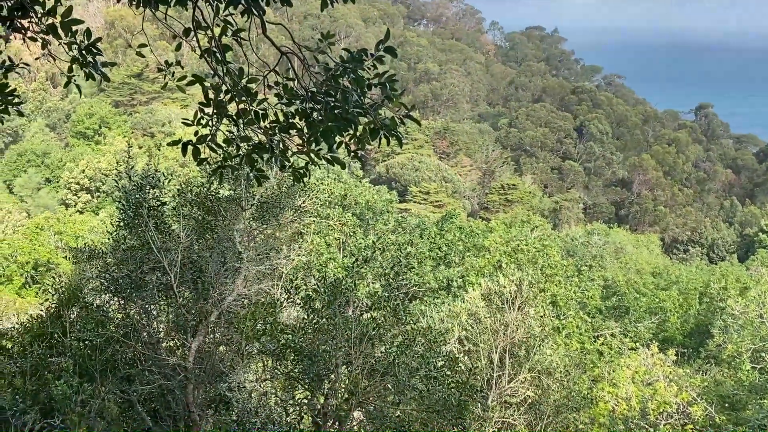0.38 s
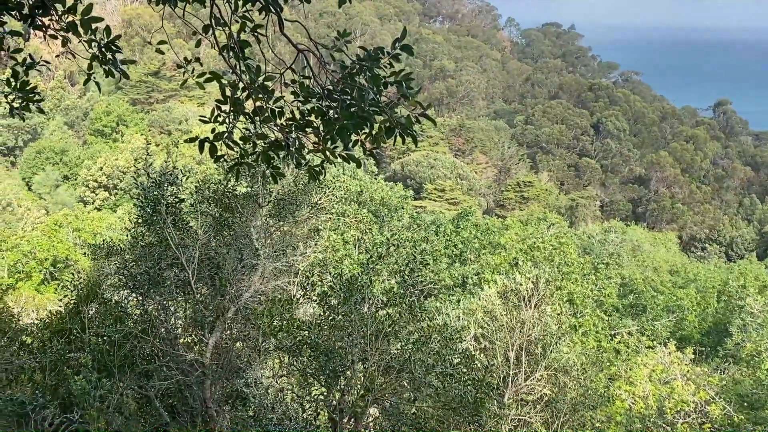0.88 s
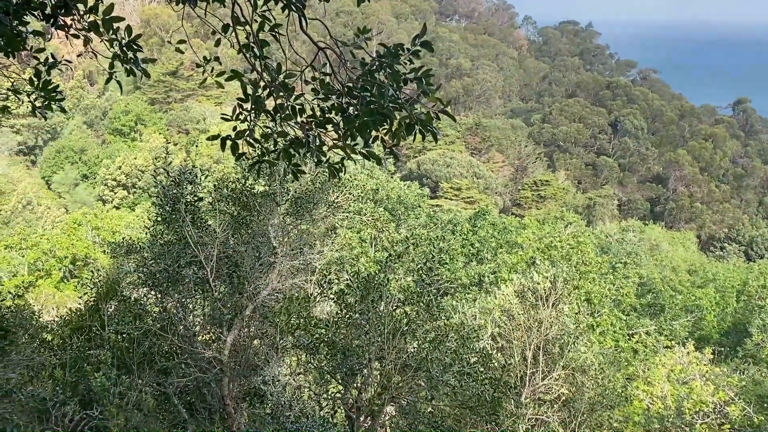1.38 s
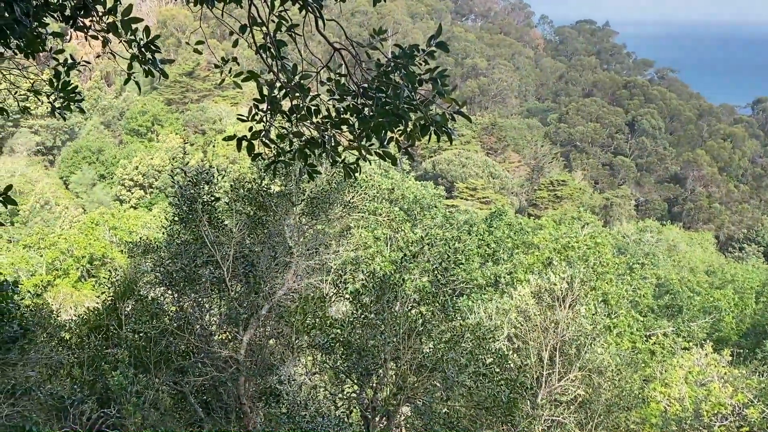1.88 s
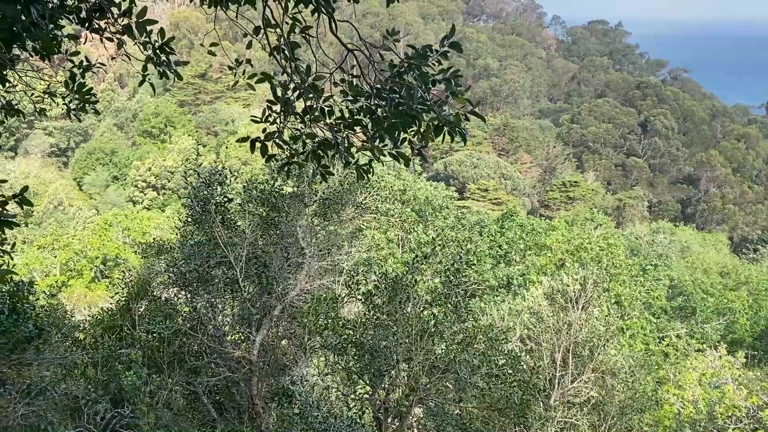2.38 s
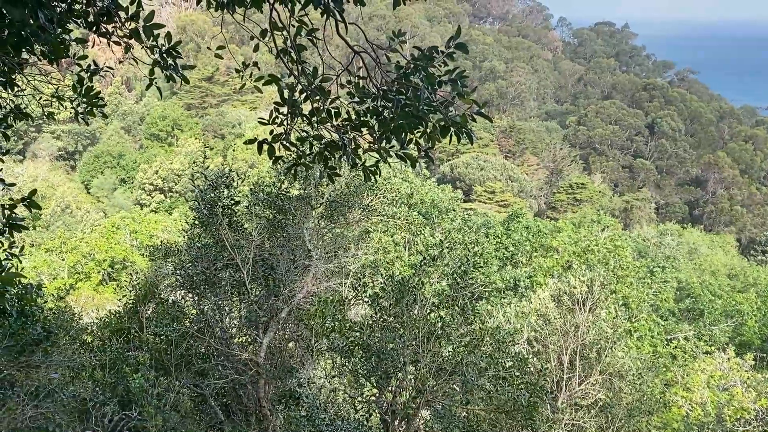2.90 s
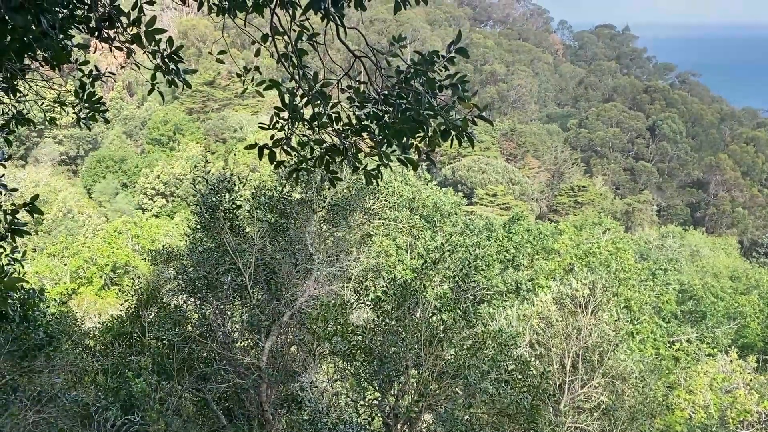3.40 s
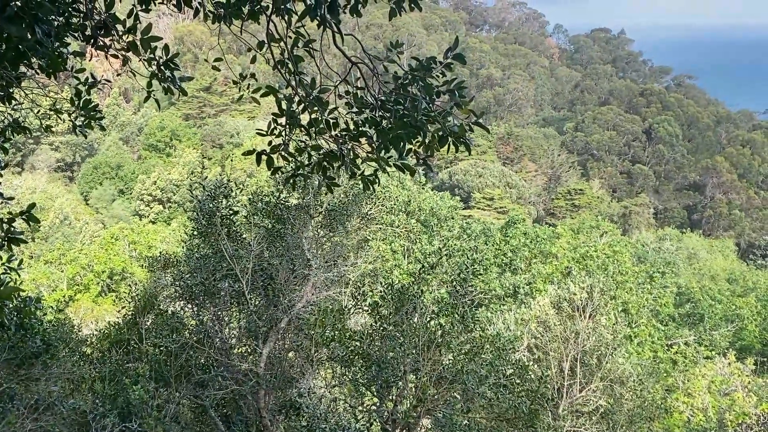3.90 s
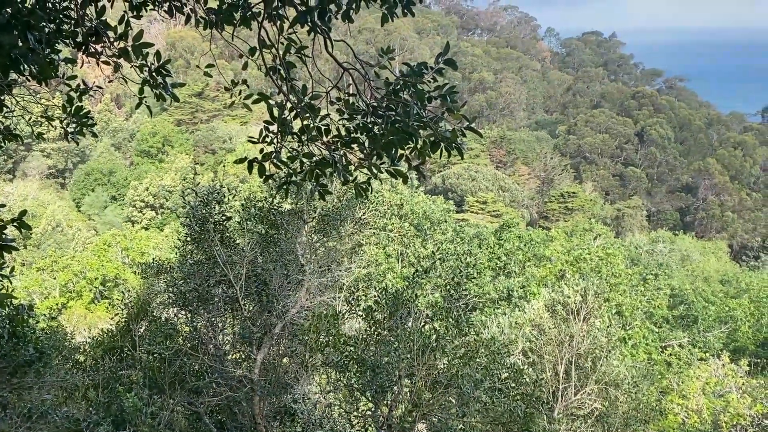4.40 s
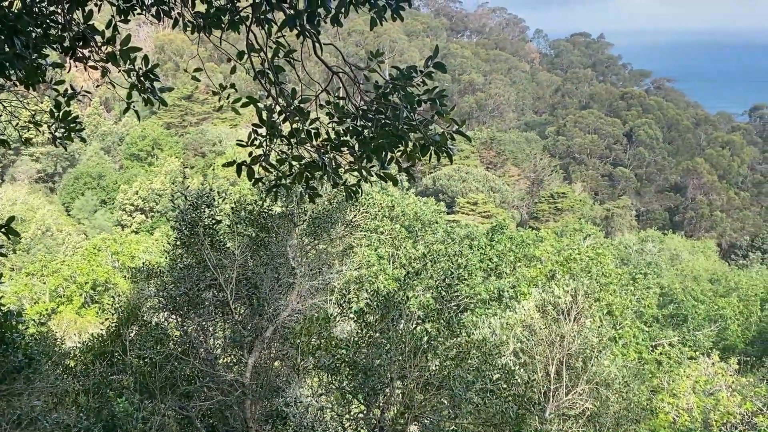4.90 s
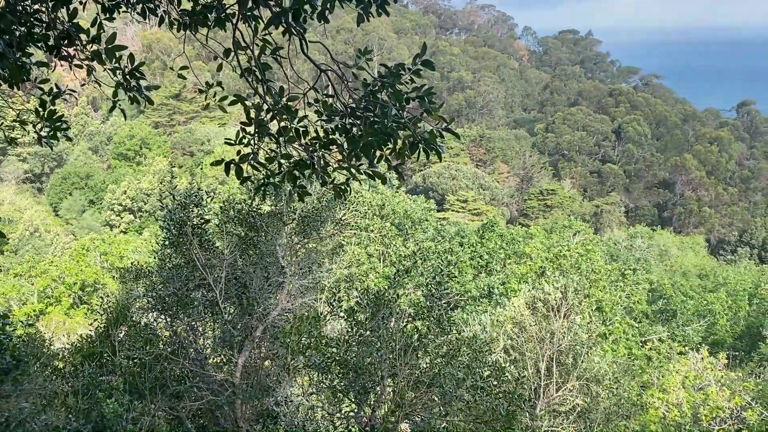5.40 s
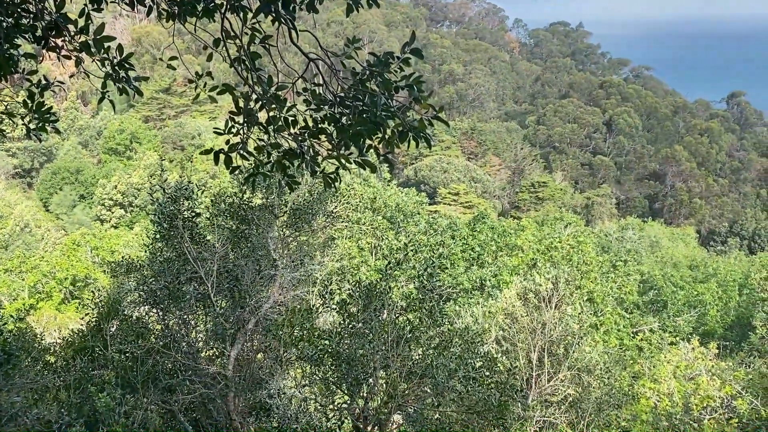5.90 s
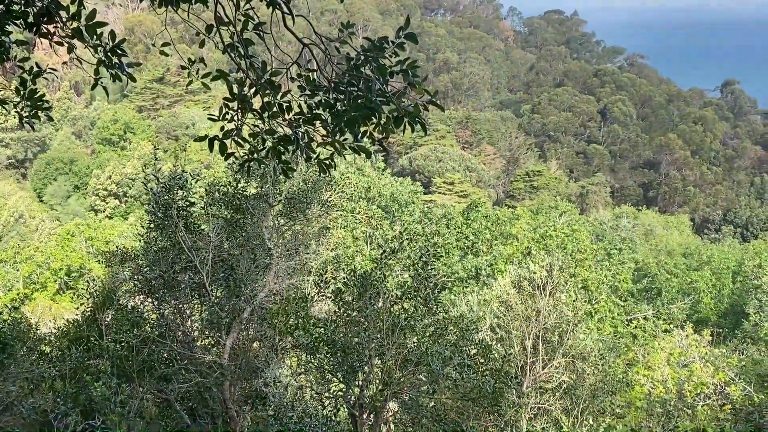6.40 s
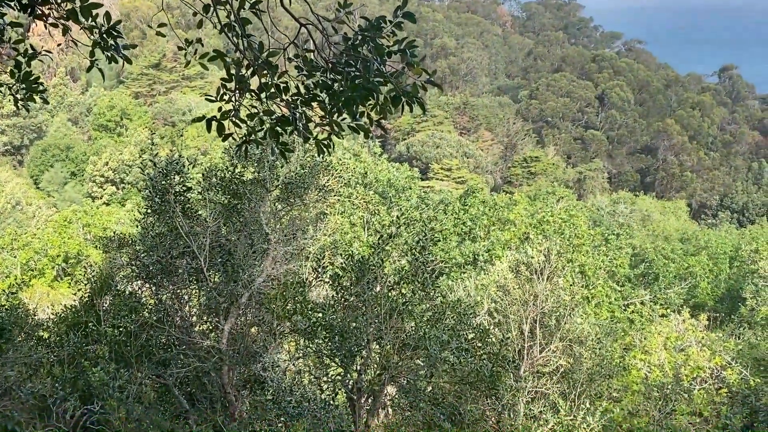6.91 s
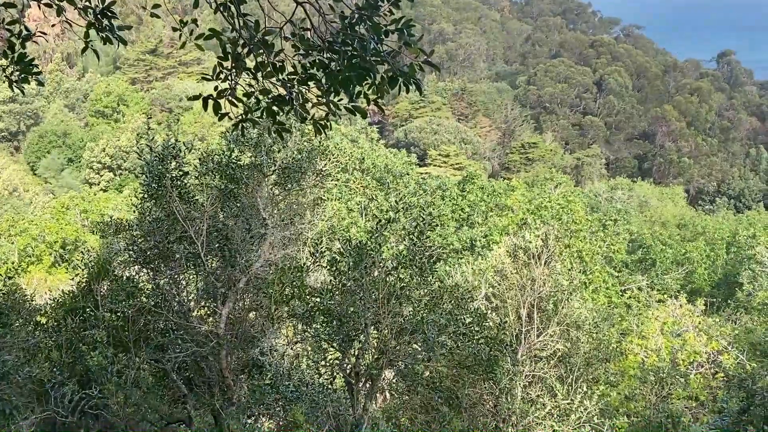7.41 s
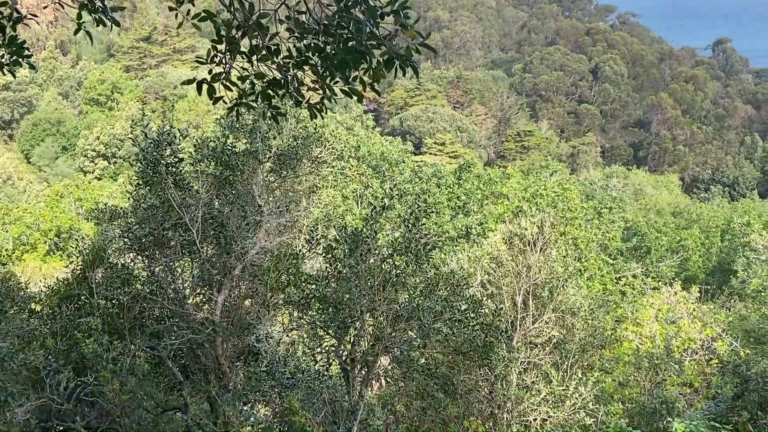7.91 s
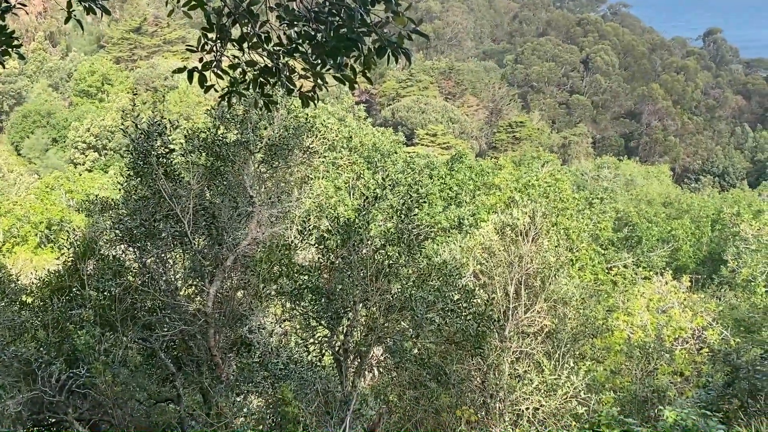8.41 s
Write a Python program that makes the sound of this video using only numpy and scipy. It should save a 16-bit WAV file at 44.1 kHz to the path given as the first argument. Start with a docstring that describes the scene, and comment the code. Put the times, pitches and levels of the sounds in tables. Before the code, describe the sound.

A wooded hillside above the sea, heard in outdoor stereo. From 0 s small birds overlap in quick high whistles and falling slurs, blurred by echoes off trunks and slope; a lower warbler repeats short figures on the left. An echoing rattle and chip come near 0.9 s, a fluttering note around 1.3 s, then a high looping trill from 1.7 to 2.5 s, gradually slowing. Buzzy shaken notes sound near 2.9 and 3.6-3.9 s, among bright couplets, hooked calls and low piping. The high singer's opening phrase returns about 4.1 s, with soft coos; a rattle runs from 4.8 to 5.4 s. A sharp twig snap lands at 6.3 s, before sparser piping, a brief rattle at 7.1 s, chips and duller taps near 7.6 s. Far surf, faint leaf hiss and low wind rumble continue throughout, with bass buffets at 3.5 s and near the end.

```python
"""A wooded hillside above the sea: wind buffets the microphone over a far low roar of surf and hissing leaves.
From the outset small birds whistle and slur, their gliding tones smeared by echoes off trunks and leaves, and
twigs tap now and then as bursts of noise through a resonance. A low warbler comes in on the left, then echoing
rattles, chips in the open and pulsing flutters. A slow trill begins before two seconds, shaken buzzy notes
before three; the song's opening returns later, and piping carries on towards the end."""
import sys
import numpy as np
from scipy import signal
from scipy.fft import rfft, irfft, next_fast_len
from scipy.io import wavfile
from scipy.ndimage import uniform_filter1d

SR = 44100
rng = np.random.default_rng(int(sys.argv[2]) if len(sys.argv) > 2 else 0)


def put_to_file(sound):
    """Save the sound as 16-bit audio at rate SR, in the file named by the first command-line argument."""
    columns = np.atleast_2d(sound).T  # one column per channel
    safe = np.clip(columns, -1, 1)
    whole_steps = np.round(safe * 32767)
    wavfile.write(sys.argv[1], SR, whole_steps.astype(np.int16))


def level_to_linear(level):
    """Convert decibel levels to linear amplitude factors, elementwise."""
    exponent = np.asarray(level, float) / 20
    return 10 ** exponent


N = 376613  # samples

# share of its glide that a note has covered half-way through: rising, falling [0-1]
CHORUS_SHARE = (0.61, 0.42)
# the same for the wren and for the couplets: rising, falling [0-1]
WREN_SHARE = (.8, 0.66)


def along(table, hz):
    """A (hz, value) table read on a log-frequency axis."""
    f, v = np.transpose(table)
    return np.interp(np.log(hz + 1), np.log(f + 1), v)


def curve(table):
    """The columns of a (time_s, ..) table, sample by sample."""
    s, *columns = np.transpose(table)
    return [np.interp(np.arange(N) / SR, s, c) for c in columns]


def walk(rate):
    """Random levels held 1 / rate s and slewed twice; spread near 1."""
    k = int(SR / rate)
    held = np.repeat(rng.standard_normal(N // k + 1), k)
    return 1.29 * uniform_filter1d(uniform_filter1d(held, k), k)[:N]


def air(spectrum, lo_hz, hi_hz):
    """Two-eared noise of a given colour, rms 1 between two frequencies, alike in the bass."""
    # share of the noise common to both ears: pitch_hz, share [0-1]
    likeness = [(60, 0.99), (240, 0.77), (500, 0.4), (1000, 0), (4000, 0.5), (9000, 0.16)]
    size = next_fast_len(N)
    hz = np.arange(size // 2 + 1) * SR / size
    like = np.clip(along(likeness, hz), 0, 1)
    mid, side = rfft(rng.standard_normal((2, size)))
    gain = level_to_linear(along(spectrum, hz))
    in_band = (hz > lo_hz) & (hz < hi_hz)
    gain = gain / np.sqrt(2 * np.sum(gain[in_band] ** 2) / size)
    mid = mid * np.sqrt((1 + like) / 2)
    side = side * np.sqrt((1 - like) / 2)
    return irfft(gain * np.array([mid + side, mid - side]), size)[:, :N]


def add(track, start_s, sound):
    """Mix a sound into a track."""
    i = max(int(start_s * SR), 0)
    track[i:i + len(sound)] += sound[:len(track) - i]


def tone(hz, db, edge=0.15):
    """A near-pure tone along a pitch path, swelling and fading."""
    swell = signal.windows.tukey(len(hz), edge)
    return np.sqrt(2) * level_to_linear(db) * swell * np.sin(2 * np.pi * np.cumsum(hz) / SR)


def whistle(notes, wobble_hz=44.8, edge=0.29):
    """Each note glides through its three pitches, corners rounded, never quite steady."""
    out, wobble = np.zeros(N), wobble_hz * walk(400)
    for start_s, length_s, *pitch_hz, db in notes:
        path = np.interp(np.linspace(0, 2, int(length_s * SR)), np.arange(3), pitch_hz)
        path = uniform_filter1d(path, int(len(path) * 0.2), mode="nearest")
        path = path + np.roll(wobble, -int(start_s * SR))[:len(path)]
        add(out, start_s, tone(path, db, edge=edge))
    return out


def bend(notes, share):
    """Give each glide its middle pitch."""
    return [(s, length, a, a + share[int(b < a)] * (b - a), b, db) for s, length, a, b, db in notes]


def repeat(figure, times, gains_db=0):
    """The same notes again at each time."""
    return [(at + s, *rest, db + g) for at, g in np.broadcast(times, gains_db) for s, *rest, db in figure]


def shaken(notes, swing, rate, scatter, pulse, edge, grow_s):
    """Vibrato spreads each note into a blurred comb and pulses its loudness, loudest at the top of a swing."""
    out, chance = np.zeros(N), walk(90)
    for start_s, length_s, first_hz, last_hz, db in notes:
        t = np.arange(int(length_s * SR)) / SR
        uneven = 1 + scatter * chance[int(start_s * SR):][:len(t)]
        shake = np.sin(2 * np.pi * rate * np.cumsum(uneven) / SR)
        glide = first_hz + (last_hz - first_hz) * t / length_s
        path = glide * (1 + swing * (1 - np.exp(-t / grow_s)) * shake)
        add(out, start_s, (1 + pulse * shake) * tone(path, db, edge=edge))
    return out


def wood(sound, pan_db, wet_db, build_s=0.0036):
    """Direct sound plus echoes off near trunks and leaves, and a longer, fainter, duller tail from the slope."""
    near_t60_s, slope_t60_s, slope_db, slope_top_hz = 0.35, 1.04, -13, 5500
    spread = 0.21  # how far the echoes differ between the ears
    t = np.arange(int(1.2 * SR)) / SR
    shared, own = rng.standard_normal((2, len(t)))
    cloud = (shared + spread * own * np.array([[1], [-1]])) * (1 - np.exp(-t / build_s))
    dull = signal.lfilter(*signal.butter(2, slope_top_hz, fs=SR), cloud)
    near = cloud * np.exp(-t * np.log(1000) / near_t60_s)
    slope = level_to_linear(slope_db) * dull * np.exp(-t * np.log(1000) / slope_t60_s)
    echo = near + slope
    echo = echo / np.sqrt(np.sum(echo[0] ** 2))
    wet = signal.fftconvolve(sound[None], echo, axes=1)[:, :N]
    # pan_db: left over right
    return (sound + level_to_linear(wet_db) * wet) * level_to_linear(np.array([[pan_db], [-pan_db]]) / 2)


def wind():
    """Turbulence on the microphone, all bass, with a few single thumps of two or three swings."""
    # colour of the rumble: pitch_hz, density_db (relative, per Hz)
    rumble_colour = [(18, -48), (30, -22.5), (45, 0), (65, 4), (100, 5.5), (180, -11.5), (300, -29),
                     (900, -100)]
    # rise and fall of the gusts: time_s, level_db
    gusts = [(0.0, -38), (1.66, -39.5), (1.81, -27), (1.92, -42.5), (2.28, -34.5), (2.43, -39.5),
             (3.47, -32), (4.05, -35), (5.3, -34), (5.66, -34), (6.28, -32.5), (6.54, -40), (7.32, -32.5),
             (7.42, -25.5), (7.5, -30), (8.0, -34.5), (8.49, -22), (8.54, -33)]
    # single hard buffets: centre_s, level_db, pitch_hz
    buffets = [(1.805, -21.5, 64), (3.466, -13, 75), (3.559, -13, 79.7), (5.679, -16, 61.6),
               (8.278, -14, 69.6), (8.459, -7.5, 70.7), (8.497, -11, 80)]
    pan_db = -2.8  # left over right
    lag = 11  # samples by which a buffet reaches the left port later
    thumps, t = np.zeros(N), np.arange(-2000, 2000) / SR
    for s, db, hz in buffets:
        add(thumps, s + t[0], level_to_linear(db) * np.exp(-(t / 0.0083) ** 2) * np.sin(2 * np.pi * hz * t))
    rumble = air(rumble_colour, 30, 100.6) * level_to_linear(curve(gusts)[0] + 0.48 * walk(22))
    both_ports = rumble + np.array([np.roll(thumps, lag), thumps])
    return both_ports * level_to_linear(np.array([[pan_db], [-pan_db]]) / 2)


def surf():
    """A far roar that swells slowly, and leaves hissing faintly as the breeze rises with it."""
    # swell of the roar: time_s, level_db
    swell = [(0.0, -38.5), (0.62, -47), (1.57, -39.5), (2.97, -47.5), (3.73, -43), (7.18, -39),
             (8.54, -36.5)]
    # colours of roar and leaves: pitch_hz, density_db (relative, per Hz)
    roar_colour = [(53, -38.5), (90, 4), (128, -1), (197, -7), (427, -39.5), (500, -39.5), (650, -72.5),
                   (1100, -120)]
    leaf_colour = [(180, -24), (300, 0), (420, -10), (700, -15.5), (1500, -28), (3300, -36.5), (6200, -34),
                   (8300, -45), (10000, -72)]
    # leaves stirring close by: centre_s, half_length_s, extra_db
    rustles = [(3.248, 0.15, 6), (5.217, 0.14, 6), (5.859, 0.17, 3.5), (6.273, 0.051, 6),
               (7.612, 0.043, 7.5)]
    roar_db = curve(swell)[0]
    # at a roar of -42 dB the leaves stand at -66.5 dB, and gain 0.4 dB per dB of roar
    leaves_db = -66.5 + 0.4 * (roar_db + 42)
    t = np.arange(N) / SR
    leaves_db = leaves_db + sum(db * np.exp(-((t - s) / half) ** 2) for s, half, db in rustles)
    roar = air(roar_colour, 105.0, 300) * level_to_linear(roar_db + 2.0 * walk(5.6))
    return roar + air(leaf_colour, 418.0, 840) * level_to_linear(leaves_db + 1.5 * walk(10))


def far_birds(count=420):
    """Scattered short slurs, mostly falling, from birds all over the slope."""
    # loudness of the distant birds: time_s, level_db
    distance_level = [(0, -75), (1.3, -73), (2.3, -87), (2.6, -97.5), (4.3, -72), (5.2, -79), (6.6, -87),
                      (7.6, -77), (8.54, -100.5)]
    s, length, pitch, middle, end, size = rng.random((count, 6)).T
    hz = 2700 * 2.5 ** (pitch ** 1.6)
    middle_hz, last_hz = hz * (0.8 + 0.3 * middle), hz * (0.4 + 0.412 * end)
    notes = np.transpose([s * N / SR, 0.013 + 0.021 * length, hz, middle_hz, last_hz, -7 * size])
    return whistle(notes, wobble_hz=89.0) * level_to_linear(curve(distance_level)[0])


def chorus():
    """Single glides, couplets and a steady dove-like coo from the trees."""
    # gliding and level whistles: start_s, length_s, first_hz, last_hz, level_db
    glides = [(0.003, 0.023, 2880, 2890, -61.5), (0.025, 0.036, 3710, 4640, -57.5),
              (0.404, 0.041, 6000, 6000, -66), (0.527, 0.026, 5870, 5810, -60.5),
              (1.41, 0.058, 4950, 5340, -67), (2.965, 0.082, 4390, 3940, -79),
              (3.155, 0.02, 4100, 5300, -78.5), (3.522, 0.052, 4670, 4180, -62.5),
              (3.54, 0.059, 5400, 5390, -73.5), (3.675, 0.034, 5570, 5170, -63),
              (3.684, 0.037, 6260, 6080, -63), (3.759, 0.021, 4490, 4180, -63.5),
              (3.61, 0.052, 5500, 5270, -68), (3.79, 0.12, 5370, 5290, -68), (3.95, 0.1, 3284, 3910, -72),
              (6.415, 0.063, 4200, 4600, -82), (6.551, 0.098, 8040, 6920, -72),
              (6.62, 0.061, 7180, 6780, -70), (6.732, 0.047, 6370, 6600, -66),
              (6.777, 0.026, 5950, 5530, -65), (6.993, 0.063, 2996, 2930, -68.5),
              (7.45, 0.049, 7000, 6430, -79.5), (7.49, 0.034, 6500, 7100, -77.5),
              (7.096, 0.069, 5480, 5460, -73.5), (7.505, 0.094, 5320, 5400, -69.5),
              (7.6, 0.076, 5280, 5380, -71), (7.656, 0.018, 4780, 3840, -63.5),
              (7.668, .024, 3930, 2900, -59.5), (7.76, 0.089, 5280, 5400, -72.5),
              (7.8, 0.013, 2480, 1470, -64), (7.91, 0.076, 3410, 3690, -71.5),
              (7.99, 0.11, 3810, 3710, -72), (8.025, 0.025, 3700, 2680, -71.5),
              (8.102, 0.035, 3600, 2910, -70), (8.14, .04, 2960, 3180, -70.5),
              (8.175, 0.063, 3200, 2920, -74.5)]
    # a sagging note, a flick up and down, a low hold: start_s, length_s, first_hz, last_hz, gain_db
    couplet = [(0, 0.027, 5530, 4990, 1), (.027, 0.017, 5140, 6280, 1.5), (.037, .022, 6250, 5150, -5),
               (.058, 0.028, 4906, 4800, -5)]
    # when the couplet is sung: start_s, level_db
    couplet_times = [(3.183, -55), (3.262, -58), (3.91, -51.5), (3.99, -55)]
    # coos on one pitch: start_s, length_s, level_db
    coo_times = [(4.356, 0.083, -65.5), (4.482, 0.17, -78), (5.16, 0.17, -67)]
    coo_hz = 1126
    coos = [(s, length, coo_hz, coo_hz, coo_hz, db) for s, length, db in coo_times]
    couplets = bend(repeat(couplet, *np.transpose(couplet_times)), WREN_SHARE)
    return whistle(bend(glides, CHORUS_SHARE) + couplets) + whistle(coos, wobble_hz=12)


def wren(count=6):
    """A loud high singer deep in the trees: gliding notes, a repeated opening and close, a slowing trill."""
    # song notes: start_s, length_s, first_hz, last_hz, level_db
    song = [(0.004, 0.043, 5100, 4980, -58.5), (1.108, 0.024, 5100, 3600, -56.5),
            (1.18, 0.066, 5310, 4700, -54.5), (1.597, 0.03, 8270, 7730, -55),
            (1.625, 0.039, 7420, 4390, -56), (5.338, 0.035, 4990, 5070, -63.5),
            (5.598, 0.024, 5190, 3620, -65)]
    # opening phrase: start_s, length_s, first_hz, last_hz, level_db
    phrase = [(0.136, 0.096, 7690, 6570, -62), (.182, 0.037, 6780, 4340, -58),
              (0.272, 0.046, 8300, 8650, -67), (.3, 0.055, 8750, 7200, -62.5),
              (0.362, 0.045, 5780, 4410, -58.5), (0.568, 0.061, 5560, 5690, -58.5),
              (0.68, 0.064, 7330, 7670, -55), (.733, 0.025, 7600, 6760, -53),
              (.778, 0.024, 6400, 4230, -68.5)]
    # the closing arch, up, held and down: start_s, length_s, first_hz, last_hz, gain_db
    arch = [(0, .034, 6100, 7030, -0.5), (.026, 0.046, 7116, 7030, -3), (0.071, .05, 6980, 6260, -4.5)]
    # when the arch is sung: start_s, level_db
    closes = [(.958, -54), (5.441, -53)]
    # one trill syllable, low lead-in, rise, held top and swelling fall:
    # start_s (from the syllable's start), length_s, first_hz, last_hz, level_db
    syllable = [(-.014, .022, 3200, 4330, -70), (.004, 0.043, 4300, 7410, -56),
                (.034, .04, 7450, 7490, -59.5), (.066, .02, 7400, 5500, -58.5),
                (.082, .024, 5400, 4370, -56.5)]
    # share of the glide covered half-way: rising, falling [0-1]
    phrase_share = (0.44, 0.55)
    syllable_share = (0.7, 0.65)
    trill = []
    for k, (a, b, c) in enumerate(rng.standard_normal((count, 3))):
        at_s = 1.695 + (0.1325 + 0.0012 * k) * k  # the spacing widens
        for s, length, *hz, db in bend(syllable, syllable_share):
            trill.append((at_s + s + 0.001 * c, length, *(np.array(hz) * (1 + 0.006 * a)), db + 0.81 * b))
    # the opening is sung once more, 3.991 s later and 1.5 dB louder
    opening = bend(list(phrase) + repeat(phrase, 3.991, 1.5), phrase_share)
    notes = list(song) + repeat(arch, *np.transpose(closes))
    return whistle(bend(notes, WREN_SHARE) + opening + trill, wobble_hz=54.3)


def twigs():
    """Snaps and taps: a dying burst of noise passed twice through one broad wooden resonance."""
    # start_s, peak_db, centre_hz, ring_s (time scale; the burst decays twice as fast)
    snaps = [(.09, -53.5, 1790, 0.012), (2.59, -55.5, 2100, 0.014), (6.279, -35.5, 4440, 0.0055),
             (7.411, -67, 6740, 0.0037), (7.548, -56, 674, .02), (7.59, -47.5, 696, 0.04),
             (7.595, -52.5, 1800, 0.015), (7.957, -50, 5050, 0.0048)]
    out = np.zeros(N)
    for s, db, hz, ring in snaps:
        burst = rng.standard_normal(4000) * np.exp(-np.arange(4000) / SR / ring * 2.0)
        for _ in range(2):
            burst = signal.lfilter(*signal.iirpeak(hz, 1.1, fs=SR), burst)
        add(out, s, level_to_linear(db) * burst / np.abs(burst).max())
    return out


def warbler(count=4):
    """A quick low singer: an evenly paced three-note figure, varying in strength, and falling slurs."""
    # the figure, then the other notes: start_s, length_s, first_hz, last_hz, level_db
    figure = [(0, 0.025, 3300, 3750, -61.5), (.034, 0.017, 3340, 3700, -65),
              (.047, .021, 3130, 3100, -59.5)]
    slurs = [(8.274, 0.026, 2440, 2830, -63.5), (8.29, 0.021, 2780, 2130, -64),
             (.569, 0.018, 4120, 3030, -59), (0.714, 0.025, 3290, 3350, -58),
             (0.759, 0.044, 3310, 2150, -65.5), (0.8, 0.033, 2860, 1990, -65.5),
             (0.858, 0.03, 3640, 2540, -63.5), (0.92, 0.041, 3220, 1870, -59.5),
             (1.097, 0.057, 3300, 1970, -66)]
    # share of the glide covered half-way: rising, falling [0-1]
    warbler_share = (0.9, .55)
    starts_s = 0.155 + 0.1415 * np.arange(count)
    figures = repeat(figure, starts_s, 1.3 * rng.standard_normal(count))
    return whistle(bend(figures + list(slurs), warbler_share))


def rattle():
    """Echoing bouts of nearly even flicks, each a steep fading rise of its own height and strength."""
    # bouts, each a list of: time_s, lowest_hz, highest_hz, level_db
    bouts = [
        [(4.79, 4350, 7200, -63.5), (4.95, 4025, 6650, -64), (5.2, 3700, 6680, -65), (5.44, 3960, 7180, -62.5)],
        [(.82, 4500, 6520, -63), (.88, 4430, 6300, -63), (.95, 4400, 6300, -84)],
        [(7.052, 5460, 6660, -60.5), (7.16, 5460, 6480, -80)],
    ]
    flicks_per_s = 38
    out = np.zeros(N)
    rise = np.linspace(0, 1, int(0.057 * SR))
    for bout in bouts:
        lo_hz, hi_hz, db = curve(bout)
        starts = np.arange(bout[0][0], bout[-1][0], 1 / flicks_per_s)
        for s, (a, b, c) in zip(starts, rng.standard_normal((len(starts), 3))):
            i = int(s * SR)
            path = lo_hz[i] * (1 + 0.073 * a) + (hi_hz[i] - lo_hz[i]) * rise ** 0.73
            add(out, s + 0.0019 * b, np.exp(-rise / 0.5) * tone(path, db[i] + 2.1 * c))
    return out


def near_bird():
    """Chips, hooks, drops and piping, all gliding tones, from birds in the open, with little echo."""
    # short upward chips: start_s, last_hz, level_db
    chip_times = [(0.915, 4540, -51.5), (3.185, 4160, -61.5), (4.75, 4220, -55), (5.786, 4240, -52.5),
                  (7.511, 4094, -54)]
    # a hook up, then steeply down: start_s, length_s, first_hz, last_hz, level_db
    hook = [(0, 0.028, 3934, 4580, -48), (.02, 0.051, 4810, 2690, -53.5)]
    # when the hook is sung: start_s
    hook_times = [3.355, 4.085]
    # a steep drop on to a held pitch: start_s, level_db
    drop_times = [(6.895, -60), (7.194, -60)]
    # a clear low piper: start_s, length_s, first_hz, last_hz, level_db
    piper = [(3.445, .1, 2215, 2195, -69.5), (3.535, 0.085, 2740, 2470, -61.5),
             (3.875, .04, 3450, 2960, -70), (4.06, 0.14, 2185, 2160, -73.5), (4.13, 0.079, 2670, 2450, -62),
             (5.447, 0.096, 3170, 3020, -65), (5.508, 0.074, 3000, 3270, -73.5),
             (7.157, 0.061, 3190, 3260, -63), (7.195, 0.047, 3260, 2960, -63),
             (7.288, 0.038, 2250, 2800, -68), (7.318, .026, 2770, 2350, -67.5),
             (7.415, 0.063, 3280, 3430, -64), (7.46, 0.047, 3420, 3170, -64),
             (7.797, 0.049, 2820, 3270, -60)]
    # share of the glide covered half-way: rising, falling [0-1]
    piper_share = (.7, 0.67)
    # each chip starts at 0.87 of its last pitch and has reached it half-way
    chips = [(s, 0.042, hz * 0.87, hz, hz, db) for s, hz, db in chip_times]
    drop_s, from_hz, to_hz = 0.028, 5050, 4180
    drop = [(0, drop_s, from_hz, to_hz, 0), (drop_s * 0.9, 0.12, to_hz, to_hz, -8)]
    piping = bend(list(piper) + repeat(drop, *np.transpose(drop_times)), piper_share)
    hooks = whistle(bend(repeat(hook, hook_times), CHORUS_SHARE))
    return hooks + whistle(piping + chips, wobble_hz=27.0, edge=0.47)


def flutter():
    """Slower wide shakes of pitch that pulse in loudness."""
    # start_s, length_s, first_hz, last_hz, level_db
    flutters = [(1.19, 0.11, 2600, 2130, -73.5), (1.289, 0.27, 3977, 4570, -62),
                (2.873, 0.18, 2227, 2422, -76.5), (3.294, 0.18, 2250, 2190, -78.5),
                (3.89, 0.15, 2250, 2180, -76), (4.63, .28, 2545, 2250, -79), (5.0, .2, 2950, 2854, -79.5)]
    return shaken(flutters, swing=0.071, rate=65, scatter=0.12, pulse=0.75, edge=0.24, grow_s=0.017)


def buzz():
    """Fast uneven shakes of pitch, loudest at the top of each swing."""
    # start_s, length_s, centre_hz, level_db
    buzzes = [(2.85, 0.12, 6850, -51.5), (3.031, 0.11, 6780, -48.5), (3.575, 0.11, 7200, -46.5),
              (3.752, 0.11, 7050, -46.5), (3.875, 0.064, 7430, -61.5)]
    climb = 0.028  # share by which a note climbs from start to end
    notes = [(s, length, hz * (1 - climb / 2), hz * (1 + climb / 2), db) for s, length, hz, db in buzzes]
    return shaken(notes, swing=0.072, rate=170, scatter=0.06, pulse=0.17, edge=0.92, grow_s=0.018)


def scene():
    """Birds and twigs in the wood, over wind and surf."""
    # echo over direct sound, more the deeper among the trees: source name, echo_db
    echo_db = {"chorus": 1, "warbler": -7.5, "near": -5.5, "wren": 7.5, "flutter": 3, "buzz": -1, "rattle":
               5.5, "far": 8, "twigs": -4}
    # phase by which the left port leads: pitch_hz, lead_rad
    port_phase = [(100, 0), (2400, .5), (3200, .9), (4800, 1.1), (5400, .4), (6000, -.8), (7200, -.2),
                  (8100, 2.2)]
    close = wood(chorus(), 0.6, echo_db["chorus"])
    close = close + wood(warbler(), 5, echo_db["warbler"])
    close = close + wood(wren(), 1.2, echo_db["wren"], build_s=0.0048)
    close = close + wood(near_bird(), 0.6, echo_db["near"])
    close = close + wood(buzz(), 0.6, echo_db["buzz"])
    close = close + wood(flutter(), 0.6, echo_db["flutter"])
    close = close + wood(rattle(), 1.9, echo_db["rattle"], build_s=0.012)
    close = close + wood(far_birds(), 0, echo_db["far"])
    close = close + wood(twigs(), 0, echo_db["twigs"])
    # the two microphone ports hear the slope with a phase gap that turns with pitch
    size = next_fast_len(N)
    hz = np.arange(size // 2 + 1) * SR / size
    turn = np.exp(0.5j * along(port_phase, hz) * np.array([[1], [-1]]))
    return irfft(rfft(close, size) * turn, size)[:, :N] + wind() + surf()


def band_limit(x):
    """A steep low-pass at the top of the band."""
    return signal.sosfilt(signal.butter(12, 15700, fs=SR, output="sos"), x)


def record(dry):
    """The microphone adds its steady self-noise to the scene."""
    # colour of the hiss: pitch_hz, density_db (relative, per Hz)
    hiss_colour = [(2000, -11), (7000, -0.5), (12200, 4), (12600, -13), (15700, -12.5)]
    heard = dry + level_to_linear(-90) * air(hiss_colour, 8700, 11200)
    return band_limit(heard)


dry = scene()
out = record(dry)
put_to_file(out)
```